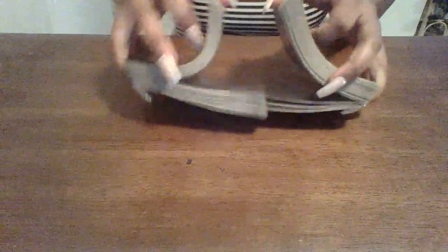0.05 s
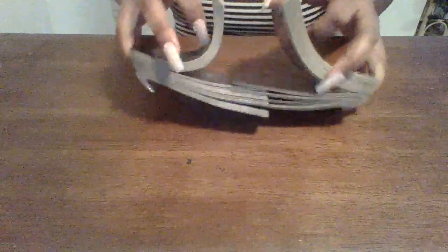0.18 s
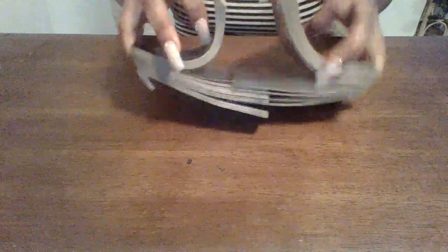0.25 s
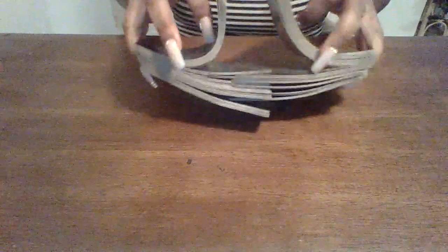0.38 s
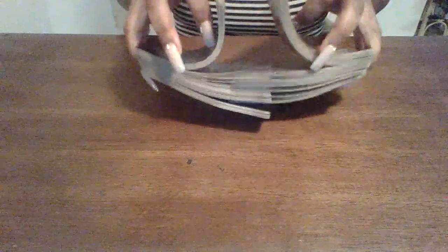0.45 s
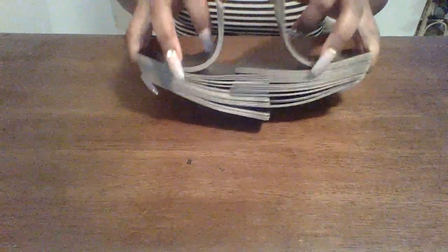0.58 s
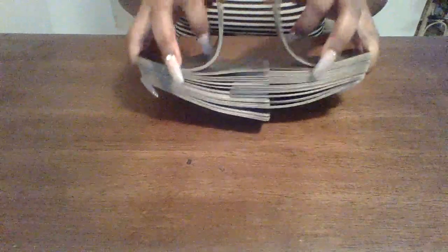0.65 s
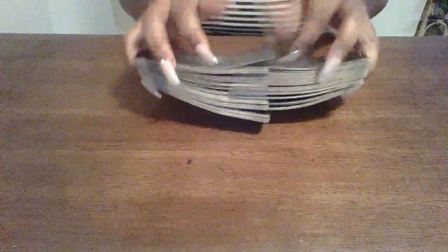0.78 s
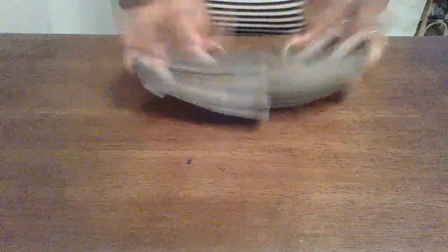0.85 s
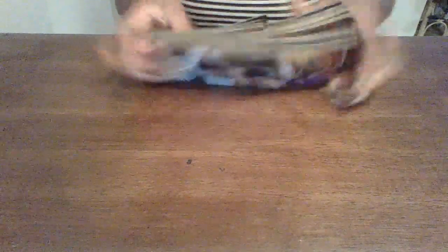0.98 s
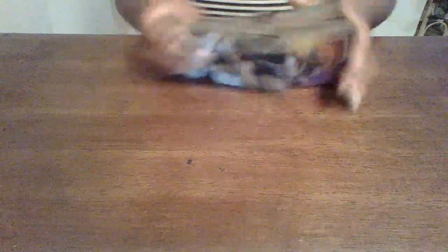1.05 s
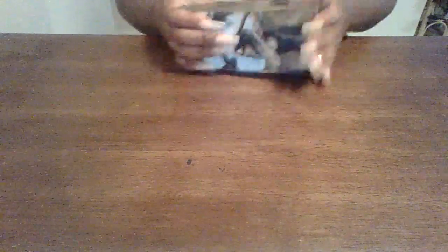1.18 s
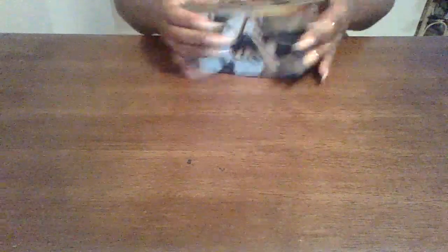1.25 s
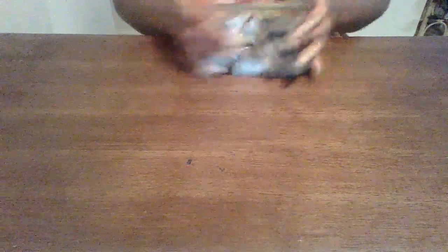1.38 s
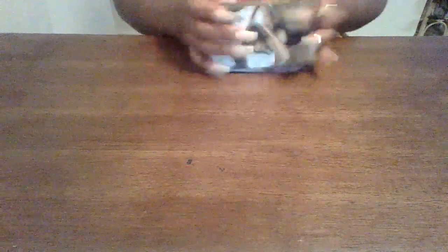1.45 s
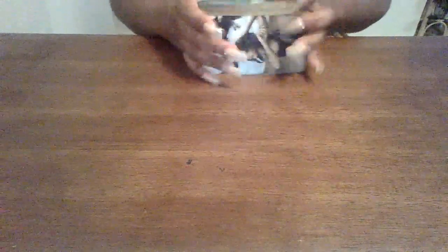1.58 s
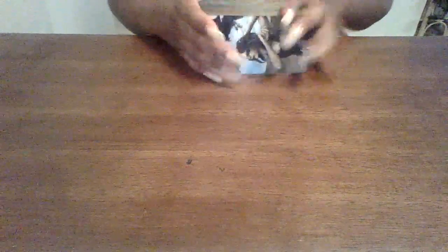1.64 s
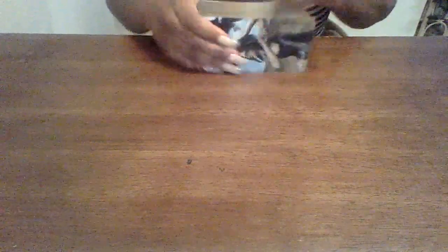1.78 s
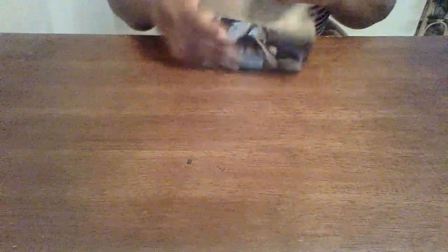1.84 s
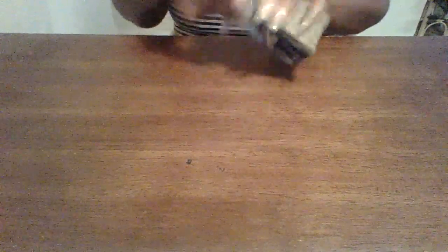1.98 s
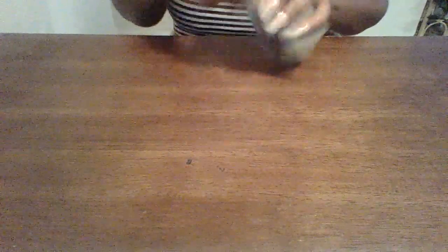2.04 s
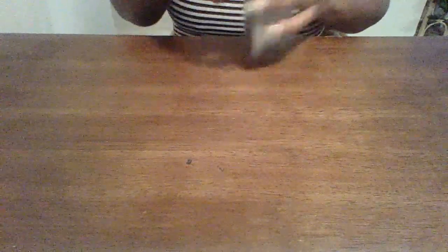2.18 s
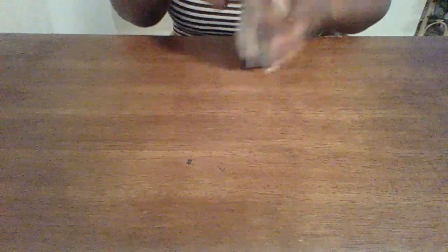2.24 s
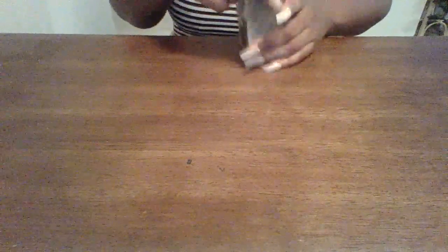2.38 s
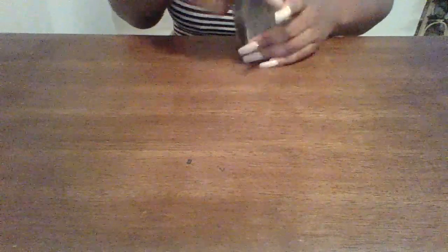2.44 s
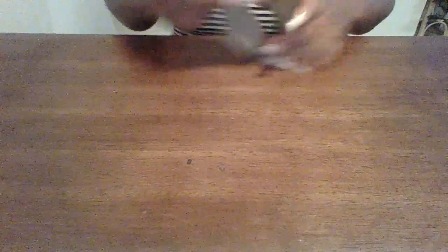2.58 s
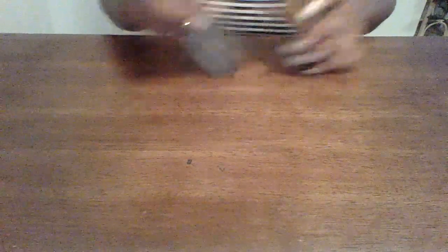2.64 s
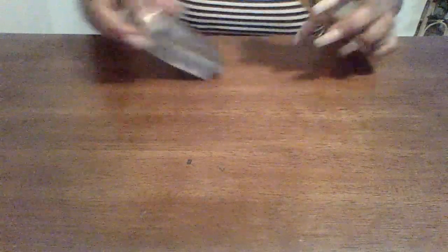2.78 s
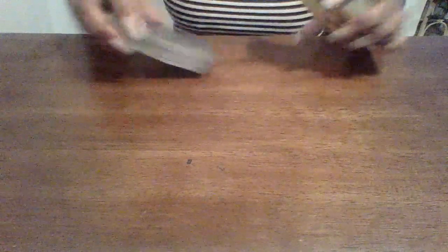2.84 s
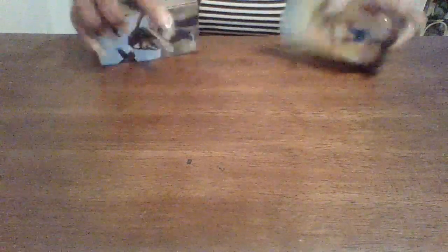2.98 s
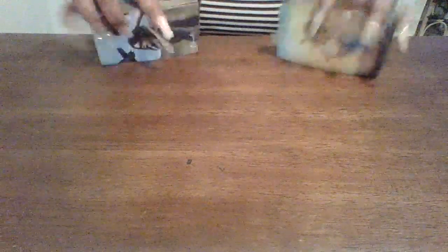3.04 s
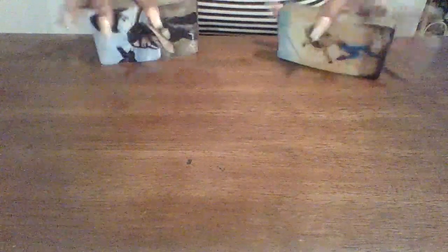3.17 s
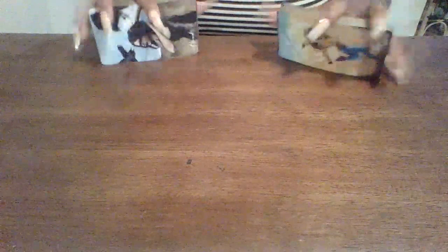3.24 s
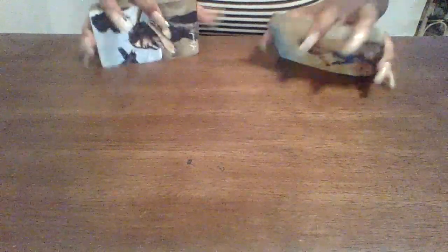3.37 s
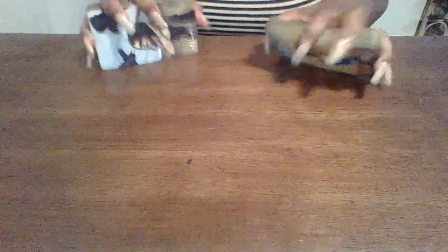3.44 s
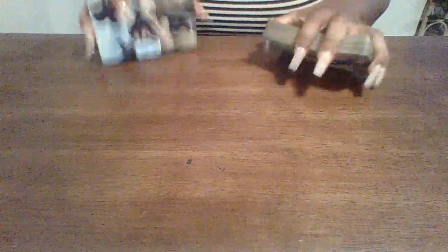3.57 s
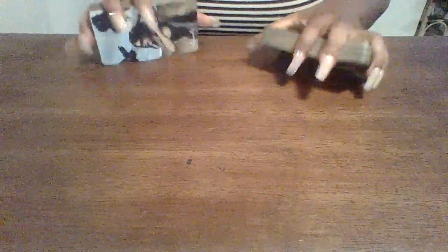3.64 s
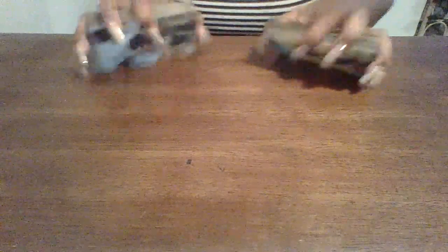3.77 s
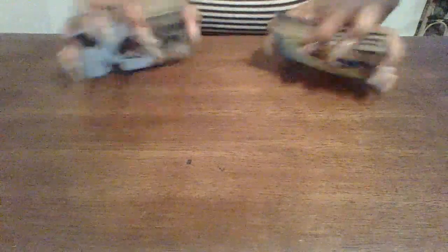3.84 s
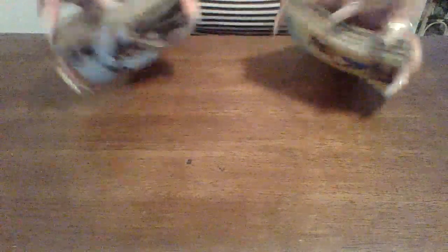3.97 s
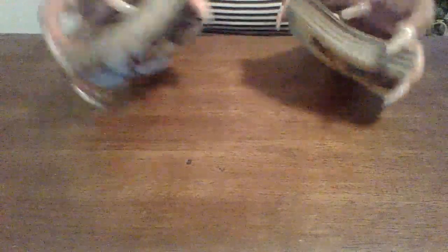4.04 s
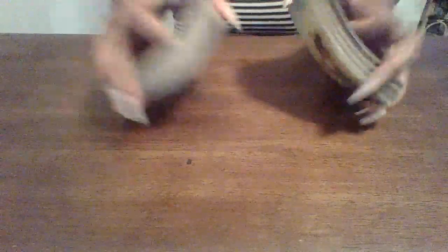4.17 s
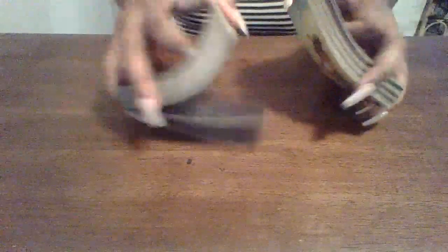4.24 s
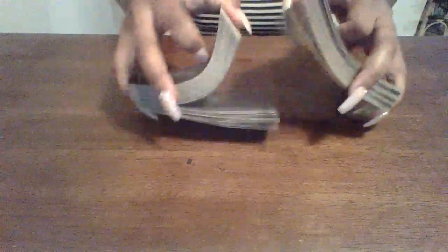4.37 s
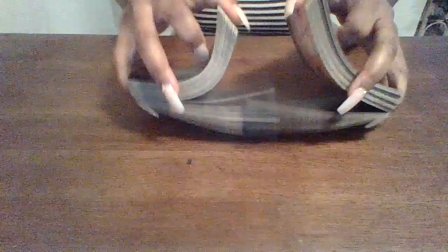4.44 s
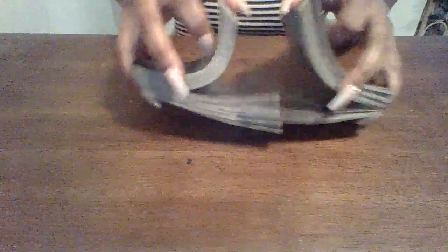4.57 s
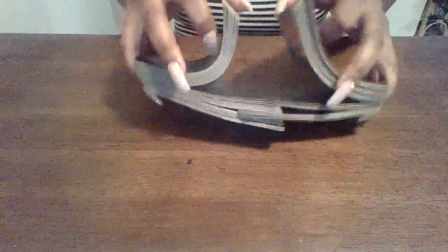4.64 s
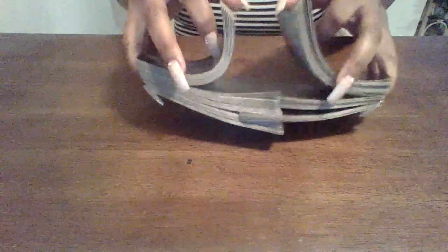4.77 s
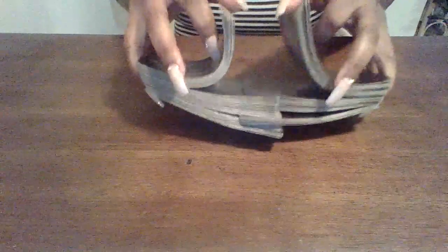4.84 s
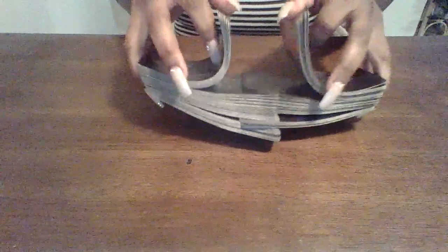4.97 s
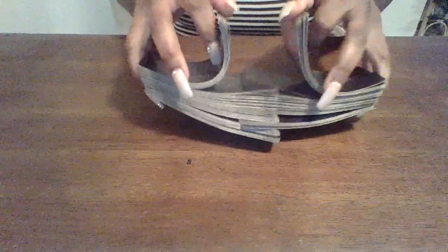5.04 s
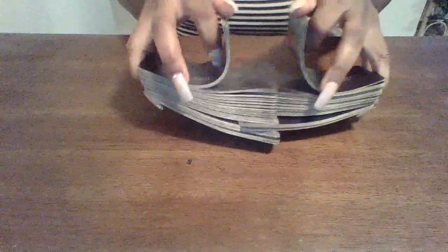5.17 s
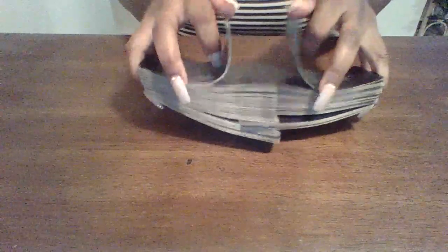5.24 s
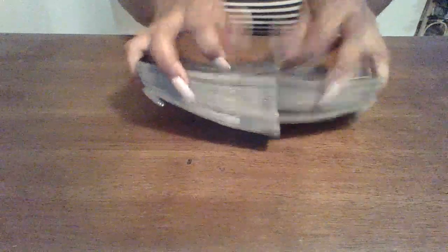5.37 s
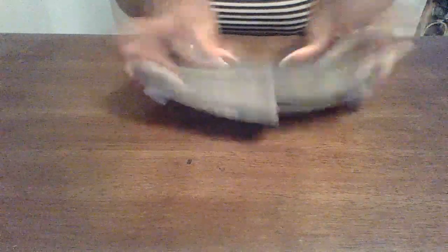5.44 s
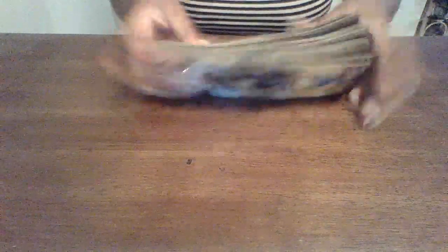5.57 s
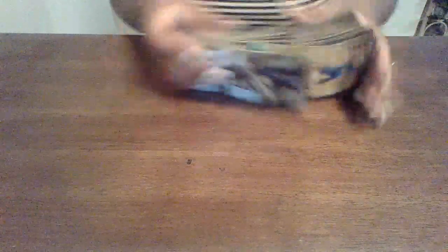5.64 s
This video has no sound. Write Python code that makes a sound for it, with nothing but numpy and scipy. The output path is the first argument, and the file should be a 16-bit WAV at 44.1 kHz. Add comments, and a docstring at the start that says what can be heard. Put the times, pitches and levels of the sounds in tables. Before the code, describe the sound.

Two card riffles on a wooden table frame a quieter middle. First comes a burst of bright flicks, then sliding card faces, a cluster of dull edge taps and light knocks. The deck thumps the table hard once, is cut and set down softly, and one card snaps. The second riffle crackles longer and brighter, ending in a soft push. Close mono pickup in a small room with short reverberation, wood-borne rumble and soft hiss.

```python
"""Small room, wooden table: large stiff playing cards are riffled, pushed together, squared and cut.
Each card snap is a noise burst: ring of the bending card, hiss of its edge, dull slap on the pile.
Sliding faces are friction grains through fixed resonances; knocks ring the table's modes.
Hand movement rumbles through the wood to a mono microphone, over steady room tone."""
import sys
import numpy as np
from scipy import signal
from scipy.fft import rfft, irfft
from scipy.io import wavfile
from scipy.ndimage import uniform_filter1d

SR = 44100
rng = np.random.default_rng(int(sys.argv[2]) if len(sys.argv) > 2 else 0)


def digitize_waveform(pressure):
    """Quantize a signal to 16-bit integers and store it at the path in sys.argv[1].

    Rows of a 2-D input are taken as channels; values are limited to [-1, 1].
    """
    field = np.atleast_2d(pressure).T
    bounded = np.clip(field, -1, 1)
    quanta = np.round(bounded * 32767).astype(np.int16)
    wavfile.write(sys.argv[1], SR, quanta)


def gain_from_decibels(decibels):
    """Convert decibel values to linear amplitude factors."""
    exponent = np.asarray(decibels, float) / 20
    return 10 ** exponent


N = 251370

# Blows on the table top. Each row: time in seconds, relative level in dB,
# tilt to the low modes in dB per octave, shove through the wood in dB.
KNOCKS = [(0.339, -35, 11, -46), (0.528, -28, 14, -40), (.779, -32, -1, -29.5), (1.057, -40.5, 1, -30),
          (1.075, -26.5, -1.5, -34.5), (1.24, -38, -3, -47.5), (1.354, -28.5, -3.5, -39),
          (1.6, -37, -8, -42), (2.319, -19, 9, -45.5), (2.3442, -9.5, -2.5, -30), (2.739, -51, 5.5, -44),
          (3.053, -41, -4.5, -40.5), (3.127, -18.5, 2, -39), (3.154, -25, 0, -39),
          (3.692, -34.5, -5.5, -35), (4.33, -28.5, -1.5, -41), (4.506, -32, 3, -42), (5.231, -32, 17, -45),
          (5.498, -32.5, 25, -56), (5.638, -30, -2.5, -37)]
# Modes of the table top. Each row: frequency in Hz, relative level in dB, T60 in seconds.
TABLE_MODES = [(60.9, -16, 0.12), (140.2, -2, 0.56), (208.8, -15, 0.27), (340.6, -9.5, 0.18),
               (410, -21, 0.4), (636, -26.5, 0.088), (734, 2.5, .04), (913, -6, 0.058), (1620, -7.5, .02),
               (1832, 0, 0.047), (2000, 0, 0.022)]


def rms_one(x):
    """Scale to rms 1."""
    return x / np.sqrt(np.mean(x ** 2) + 1e-20)


def in_time(rows):
    """Columns of a curve, one value per sample."""
    s, *columns = np.transpose(rows)
    return [np.interp(np.arange(N) / SR, s, c) for c in columns]


def at_hz(points, hz):
    """Read a table on a log-frequency axis."""
    table_hz, values = np.array(points).T
    return np.interp(np.log(hz), np.log(table_hz), values)


def band(x, low_hz, high_hz):
    """Butterworth band-pass."""
    edges_hz = np.clip([low_hz, high_hz], 10, .45 * SR)
    return signal.sosfilt(signal.butter(2, edges_hz, "band", fs=SR, output="sos"), x)


def resonance(x, hz, width_hz):
    """Two-pole resonance with gain 1 on top."""
    r = np.exp(-np.pi * width_hz / SR)
    poles = [1, -2 * r * np.cos(2 * np.pi * hz / SR), r * r]
    return signal.lfilter([(1 - r * r) / 2, 0, (r * r - 1) / 2], poles, x)


def drift(rate_hz):
    """Low-passed noise with rms 1: a slow random wander."""
    r = np.exp(-2 * np.pi * rate_hz / SR)
    wander = signal.lfilter([1], [1, -2 * r, r * r], rng.standard_normal(N + SR))
    return rms_one(wander[SR:])


def swell(s, db, rise_s, fall_s):
    """Power envelope: each event rises and dies away exponentially; fall_s is for amplitude."""
    power = np.full(N, 1e-18)
    np.add.at(power, np.round(np.asarray(s) * SR).astype(int), gain_from_decibels(2 * np.asarray(db)))
    rise, fall = np.exp(-1 / (rise_s * SR)), np.exp(-2 / (fall_s * SR))
    dying = signal.lfilter([1], [1, -fall], power)
    return signal.lfilter([1 - rise], [1, -rise], dying)


def snap_rows():
    """All snaps as (s, body dB, body Hz, edge dB, slap dB, ms); high or loud snaps slap relatively less."""
    # Cards off the thumb. Each row: time in seconds, body level in dB, body centre in Hz,
    # edge hiss in dB re body, length in ms.
    flicks = [(0.0246, -19.5, 1720, -23, 3.4), (.036, -17, 3340, -4, 3.9), (0.0401, -13, 3470, 5.5, 3.5),
              (0.0607, -24.5, 3650, 4, 2.5), (0.0856, -20, 2600, -13, 1.7), (0.1292, -24.5, 1600, -1, 0.49),
              (0.1575, -19.5, 4840, 5.5, 0.79), (0.19, -19.5, 4040, -3, 0.52),
              (.245, -23, 3650, -0.5, 0.87), (0.2516, -32, 1860, -6.5, 5.1), (0.2642, -35, 3150, -2.5, 2.8),
              (0.3317, -35, 1530, -14.5, 0.81), (0.3461, -22, 2280, 0.5, 8.7),
              (0.3592, -18.5, 2310, -1.6, 0.89), (0.437, -46, 1350, 5, 5.8), (.454, -41.5, 1250, -5, 2.3),
              (0.4816, -27.5, 2520, 4, 1.6), (0.489, -34, 1320, -11, 2.8), (0.5253, -27.5, 1900, -2.5, 4),
              (0.541, -25.5, 3820, 0.5, 2.1), (0.5489, -27, 2420, -5.5, 5.7), (0.5643, -21.5, 3390, 2, 3.6),
              (0.587, -31, 4920, 2, 4.8), (0.6132, -21.5, 2540, -0.5, 2.6),
              (.6299, -22.5, 2300, -3.5, 0.98), (.649, -20, 2450, -31, 2.9),
              (.6747, -14.5, 2170, -27.5, 0.34), (0.7122, -12.5, 3970, -1.8, 1.3),
              (0.7212, -11, 4140, -4, 1.37), (.774, -16.5, 5600, 3, 3), (0.7901, -29, 4050, -5, 12),
              (0.8019, -24.5, 3000, 1, 1.3), (0.8098, -25, 5310, 5.5, 3.4), (0.8293, -27, 3170, 3, 7.5),
              (3.693, -9, 2780, -15, 2), (3.699, -25, 1510, -29.5, 7.7), (4.3309, -18.5, 2750, -0.1, 3.7),
              (4.3666, -30.5, 2080, -3.5, 2.7), (4.4135, -41.5, 2260, 6, 1.8), (4.428, -49, 1240, 13, 1.9),
              (4.4617, -37, 1470, 1, 3), (4.4684, -31.5, 4100, -15, 2.5), (4.5055, -20.5, 3080, 2, 5.6),
              (4.5738, -52.5, 850, -10, 6.2), (4.5971, -42.5, 2380, -1, 9.3), (4.6198, -21, 2400, -5, 0.32),
              (4.6547, -32, 3030, -1.5, 3), (4.7005, -36.5, 1080, -15, 1.9), (4.7076, -19, 4000, 1, 2.5),
              (4.7105, -4, 3560, -18, 1.7), (4.7163, -20.5, 3330, 1.5, 3.5), (4.7684, -10, 3600, -5, 3.4),
              (4.7752, -10.5, 4800, -3.5, 2.3), (4.7937, -7.5, 3600, -4.5, 2.6),
              (4.8013, -21, 3280, -4, 9.2), (4.8576, -12.5, 5200, -28.5, 3.1),
              (4.8722, -42, 1500, -14, 4.7), (4.8997, -18.5, 4580, 5.5, 1), (4.9213, -40, 1670, -20, 2.9),
              (4.9419, -16, 3850, 1.5, 3.3), (4.9687, -15.5, 5030, -4.5, 2.7), (4.9908, -12, 3040, 0.5, 2),
              (4.997, -22, 4100, -15, 7.1), (5.0481, -25.5, 3130, 0, 3.1), (5.069, -20, 2720, -8, 2.5),
              (5.0783, -18, 4840, 5, 2.8), (5.132, -12.5, 4800, 4.5, 1.5), (5.1353, -22, 5170, -16, 1.3),
              (5.1457, -14, 4000, 0, 2.1), (5.1824, -33, 2100, -13, 8.1), (5.2169, -28.5, 2300, -22, 4.2),
              (5.2412, -14, 1480, -0.5, 1.07), (5.2451, -19, 3370, -11, 5.1), (5.2546, -33, 1880, -11, 7.8),
              (5.2659, -21, 3100, -2, 2.1), (5.293, -21.5, 3120, -1, 2.5), (5.3017, -30, 3040, -10.5, 6.1),
              (5.3118, -20.5, 3500, -3, 3), (5.3219, -29.5, 3300, -16.5, 30), (5.3405, -25, 3260, 0.5, 5.9),
              (5.3606, -26, 3430, -2, 3.4), (5.371, -24.5, 3120, 2.5, 1.7), (5.3985, -27, 5360, 1.5, 3.7)]
    # Deck edges tapped square and set on the table.
    # Each row: time in seconds, body level in dB, body centre in Hz, length in ms.
    taps = [(1.0781, -22, 3300, 1.4), (1.112, -34, 3570, 15), (1.351, -21.5, 1980, 2.5),
            (1.356, -19.5, 1980, 17.8), (1.3789, -19, 2660, 3.2), (1.387, -25, 2020, 2.4),
            (1.4419, -21.5, 2720, 1.4), (1.4913, -29.5, 1890, 6.9), (1.5132, -29, 2160, 1.8),
            (1.538, -31, 2250, 3.7), (1.5639, -25, 2670, 6.2), (1.5722, -22, 2630, 1.8),
            (1.5828, -25, 2000, 10.4), (1.6008, -12, 3360, 0.94), (1.6088, -29, 4290, 1.4),
            (1.6248, -20, 3100, 0.96), (1.695, -41.5, 2140, 8.4), (2.3181, -39.5, 1203, 24),
            (2.3334, -23.5, 920, 2.2), (2.3447, -11.5, 1520, 1), (2.3543, -21.5, 1270, 11),
            (3.049, -36.5, 1740, 6.6), (3.0538, -40, 1300, 15), (3.1293, -24, 1820, 4.1),
            (3.1449, -36, 1220, 6.8), (3.1565, -22, 1435, 13), (3.1687, -34, 1390, 8.7),
            (3.2654, -46.5, 1380, 4.8), (3.2945, -38.5, 1790, 4.9), (3.4907, -60.5, 980, 17),
            (5.6386, -32, 1830, 2.3)]
    # Nails and corners ticking. Each row: time in seconds, body level in dB, body centre in Hz.
    ticks = [(.9395, -38, 2780), (0.9622, -37, 2860), (1.0265, -48, 2600), (1.8318, -39, 3160),
             (1.9352, -54, 2420), (1.993, -57, 2270), (2.1219, -45, 5330), (2.162, -52, 4570),
             (2.1949, -52, 5250), (2.359, -29.5, 3600), (2.599, -48.5, 3150), (2.614, -54, 2430),
             (2.7398, -55.5, 1500), (2.7908, -60, 870), (2.887, -51, 2560), (2.9293, -58.5, 1900),
             (3.0146, -49, 2670), (3.3262, -33.5, 4080), (3.688, -40.5, 4040), (4.005, -53, 3600),
             (4.209, -49, 1720), (4.233, -44.5, 2270), (4.269, -60, 1780), (4.291, -51, 5630),
             (4.3029, -51, 3560), (5.4962, -36.5, 3500), (5.528, -39, 3900), (5.6, -49, 2160),
             (5.6526, -33, 3940)]
    # Weak cards slipping at random. Each row: start in seconds, end in seconds, mean body level in dB.
    flutter = [(0.506, .85, -32.5), (4.378, 4.698, -53), (5.1, 5.418, -40)]
    tap_edge_db, tick_edge_db, tick_ms = -23.5, 0, 2.5
    # slap re body, for a body at 2 kHz and the reference level
    flick_slap_db, tap_slap_db, tick_slap_db = -3, -10, -11.5
    slap_db_per_octave, slap_lag_db_per_db, reference_db = -8.5, 0.35, -23.5

    rows = [(s, db, hz, edge_db, flick_slap_db, ms) for s, db, hz, edge_db, ms in flicks]
    rows += [(s, db, hz, tap_edge_db, tap_slap_db, ms) for s, db, hz, ms in taps]
    rows += [(s, db, hz, tick_edge_db, tick_slap_db, tick_ms) for s, db, hz in ticks]
    for start_s, end_s, mean_db in flutter:
        places, chance = rng.random(size=10), rng.standard_normal(size=(10, 3))
        for place, (louder, higher, hissier) in zip(places, chance):
            s = start_s + (end_s - start_s) * place
            hz = 2600 * gain_from_decibels(4.9 * higher)
            rows.append((s, mean_db + louder, hz, 5 * hissier, flick_slap_db, tick_ms))
    rows = np.array(rows)
    octaves = np.log2(rows[:, 2] / 2000)
    rows[:, 4] += slap_db_per_octave * octaves - slap_lag_db_per_db * (rows[:, 1] - reference_db)
    return rows


def colour(x, bend=1):
    """Fixed resonances that colour every card sound, over a plain share; bend scales their frequencies."""
    # Each row: frequency in Hz, width in Hz, level in dB re plain share.
    resonances = [(800, 43, 14), (1612, 290, 13.5), (1900, 89, -4.5), (2620, 240, 9), (3900, 1900, -5),
                  (6070, 1300, -2)]
    return x + sum(gain_from_decibels(db) * resonance(x, bend * hz, width_hz) for hz, width_hz, db in resonances)


def snaps(rows):
    """Each snap is a noise burst in three parts: bending ring of the card, hiss of its edge, dull slap."""
    size = 4096
    out = np.zeros(N + size)
    now_ms = np.arange(size) * 1000 / SR
    noises = rng.standard_normal((len(rows), 3, size))
    for (s, db, hz, edge_db, slap_db, length_ms), noise in zip(rows, noises):
        length_ms = max(length_ms, .3)
        attack = 1 - np.exp(-now_ms / (0.36 * length_ms))
        decay = np.exp(-now_ms / (0.64 * length_ms)) + 0.073 * np.exp(-now_ms / 5.2)
        bursts = noise * attack * decay
        ring = resonance(resonance(bursts[0], hz, 1.5 * hz), hz, 1.5 * hz)
        bend = gain_from_decibels(.5 * noise[0, 0])   # slight, at random per snap
        body = colour(band(ring, 0.076 * hz, 3.37 * hz), bend=bend)
        edge = band(bursts[1], 7300, 19000)
        pile_note = resonance(bursts[2], 600, 210)   # woody
        slap = band(bursts[2], 140, 1200) + 0.5 * pile_note
        at = round(s * SR) - 20
        # each part is levelled by its highest short-term rms
        for part, part_db, window in ((body, 0, 70), (edge, edge_db, 70), (slap, slap_db, 200)):
            top = np.sqrt(uniform_filter1d(part ** 2, size=window).max())
            out[at:at + size] += gain_from_decibels(db + part_db) * part / top
    return out[:N]


def friction(column, steady_db, s, after_db):
    """Gain of a friction layer: steady rubbing, strokes and settling after snaps add in power."""
    # One pile along another. Each row: peak time in seconds, rise in seconds, scrape in dB, hiss in dB.
    stroke_rows = [(.36, 0.036, -40.5, -40), (1.115, 0.077, -48.5, -45.5), (1.236, 0.057, -41, -36.5),
                   (1.469, 0.081, -53.5, -47), (1.638, 0.033, -39, -58), (1.829, 0.028, -51, -48.5),
                   (2.113, 0.058, -58.5, -50), (2.449, 0.2, -44.5, -59), (2.645, 0.047, -54, -57.5),
                   (2.684, 0.018, -66, -56), (2.735, .025, -70, -60.5), (2.808, 0.038, -63.5, -55.5),
                   (3.053, 0.023, -47, -45.5), (3.334, 0.0324, -45, -60), (3.494, .06, -61.5, -61.5),
                   (3.886, 0.052, -56.5, -54.5), (3.991, 0.032, -59.5, -63), (4.242, .05, -64, -77.5),
                   (5.148, 0.025, -25, -26)]
    stop_faster = 2   # a stroke ends more abruptly than it starts
    now_s = np.arange(N) / SR
    strokes = np.zeros(N)
    for row in stroke_rows:
        away = (now_s - row[0]) / row[1] * np.where(now_s > row[0], stop_faster, 1)
        strokes += gain_from_decibels(2 * row[column]) * np.exp(-4 * away ** 2)
    settling = swell(s, after_db, rise_s=0.001, fall_s=0.037)
    return np.sqrt(gain_from_decibels(2 * steady_db) + strokes + settling)


def slide(rows):
    """Dense friction grains of random size excite shifted resonances; their treble is heard as hiss."""
    # Steady rubbing of card faces. Each row: time in seconds, scrape in dB, hiss in dB.
    rubbing = [(0, -31.5, -36), (.1, -50, -52), (.3, -59.5, -53), (.55, -49, -49.5), (.84, -51.5, -40.5),
               (1.01, -57.5, -60.5), (1.3, -52, -57), (1.56, -37, -55), (1.77, -59, -81), (2.23, -78, -85),
               (2.65, -58.5, -76), (3, -72, -61.5), (3.66, -74, -86.5), (4.15, -79.5, -93),
               (4.5, -57, -56.5), (4.72, -47, -44), (5.36, -44, -37.5), (5.45, -50, -51), (5.63, -65, -62),
               (5.7, -36.5, -54)]
    # Copies of the resonances, each coming and going by itself: one frequency factor per entry.
    bends = (.88, 1.01, 1)
    flex_db, settle_scrape_db, settle_hiss_db = 6, -21, -20   # settling re body, re edge hiss
    scrape_db, hiss_db = in_time(rubbing)
    s, db, hz, edge_db = rows.T[:4]
    sizes = gain_from_decibels(2.5 * np.minimum(rng.exponential(1, N), 5)) * rng.choice([-1, 1], N)
    present = rng.random(N) < 9000 / SR   # grains per second
    grains = sizes * present * gain_from_decibels(2.2 * drift(90.0))
    rub, hiss = band(grains, 230, 4100), band(grains, 3200, 15000)
    scrape = sum(gain_from_decibels(flex_db * drift(5.2)) * colour(rub, bend=bend) for bend in bends)
    scrape_gain = friction(column=2, steady_db=scrape_db, s=s, after_db=db + settle_scrape_db)
    hiss_gain = friction(column=3, steady_db=hiss_db, s=s, after_db=db + edge_db + settle_hiss_db)
    return scrape_gain * rms_one(scrape) + hiss_gain * rms_one(hiss)


def knocks():
    """Soft blows strike every table mode as a decaying sine; each blow has its own tilt to the low modes."""
    s, db, tilt_db, _ = np.transpose(KNOCKS)
    at, out = np.round(s * SR).astype(int), np.zeros(N)
    spread_db = rng.normal(0, 0.58, (len(at), len(TABLE_MODES)))
    for k, (hz, mode_db, t60_s) in enumerate(TABLE_MODES):
        blows = np.full(N, 1e-18)
        blows[at] = gain_from_decibels(db + mode_db - tilt_db * np.log2(hz / 141) + spread_db[:, k])
        r, w = gain_from_decibels(-60 / (t60_s * SR)), 2 * np.pi * hz / SR
        ringing = signal.lfilter([0, np.sin(w)], [1, -2 * r * np.cos(w), r * r], blows)
        out += (-1) ** k * ringing
    return gain_from_decibels(-11) * signal.lfilter([.3], [1, -.7], out)   # the contact is soft


def hands():
    """Low noise carried by the wood keeps the two lowest table modes stirring; every knock shoves it."""
    # Pressure of the hands, as rumble. Each row: time in seconds, level in dB.
    pressure = [(0, -39.5), (.35, -50), (.65, -39.5), (.86, -46), (1.01, -54), (1.21, -50), (1.32, -49.5),
                (1.89, -54.5), (2.25, -60.5), (2.69, -61), (2.89, -55.5), (3.55, -53.5), (3.66, -68.5),
                (3.92, -55), (4.14, -68), (4.43, -44), (4.8, -46), (5.2, -45), (5.36, -36.5), (5.57, -60),
                (5.7, -36)]
    level_db, = in_time(pressure)
    s, _, _, shove_db = np.transpose(KNOCKS)
    noise = rng.standard_normal(N) * gain_from_decibels(2.5 * drift(15.0))
    rumble = rms_one(band(band(noise, 17, 75), 5.3, 210)) + gain_from_decibels(-11) * rms_one(band(noise, 100, 500))
    stirred = sum(gain_from_decibels(-8.5) * rms_one(resonance(noise, hz, 18.0)) for hz, _, _ in TABLE_MODES[:2])
    shoves = swell(s, shove_db, rise_s=0.0044, fall_s=0.044)
    return np.sqrt(gain_from_decibels(2 * level_db) + shoves) * (rumble + stirred)


def room(x):
    """A near wall, and a diffuse tail: quarter-octave bands of noise that die at their own rate."""
    # Decay. Each row: frequency in Hz, T60 in seconds.
    decay_times = [(200, .45), (1000, .38), (2000, .36), (4000, .3), (6000, .23), (9000, .15), (14000, .11)]
    # Reverberant energy. Each row: frequency in Hz, energy in dB.
    energies = [(200, -10.5), (500, -7.5), (1000, -24.5), (2000, -10.5), (3500, -10), (5500, -12.5),
                (8000, -14), (14000, -31)]
    wall_s, wall_db = .0081, -12
    now_s = np.arange(SR // 2) / SR
    edges_hz, tail = 100 * 2 ** np.arange(0, 7.6, .25), 0
    noises = rng.standard_normal((len(edges_hz), len(now_s)))
    for low, high, noise in zip(edges_hz, edges_hz[1:], noises):
        hz = np.sqrt(low * high)
        decay = gain_from_decibels(-60 * now_s / at_hz(decay_times, hz))
        dying = band(noise, low, high) * decay * (1 - np.exp(-now_s / 0.004))
        share = (high - low) / (SR / 2)
        tail = tail + dying * gain_from_decibels(at_hz(energies, hz)) * np.sqrt(share / np.sum(dying ** 2))
    smear = rng.standard_normal(60) * np.hanning(60)
    echo = band(signal.fftconvolve(x, smear / np.linalg.norm(smear)), 3500, 9000)
    wall = np.pad(echo, (round(wall_s * SR) - 30, 0))   # less half the smear
    return signal.fftconvolve(x, tail)[:N] + gain_from_decibels(wall_db) * wall[:N]


def air():
    """Room tone and microphone hiss: steady noise shaped by a spectrum."""
    # Each row: frequency in Hz, relative density in dB per Hz.
    spectrum = [(15, -21), (25, 1.5), (149, 6.5), (229, -23.5), (317, -7.5), (354, -11), (695, -22.5),
                (1100, -31), (3080, -18), (16000, -23.5)]
    level_db = -59.5   # rms
    hz = np.maximum(np.arange(N // 2 + 1) * SR / N, 15)
    shaped = rfft(rng.standard_normal(N)) * gain_from_decibels(at_hz(spectrum, hz))
    return gain_from_decibels(level_db) * rms_one(irfft(shaped, N))


def scene():
    """Cards and table in the room, hands through the wood, room tone under all."""
    rows = snap_rows()
    cards = snaps(rows) + slide(rows)
    table = knocks()
    airborne = cards + band(table, 550, 8000)   # the low modes reach the microphone through the wood
    mono = cards + table + room(airborne) + hands() + air()
    return np.stack([mono, mono])


def roll_off(x):
    """The treble ends steeply here."""
    return signal.sosfilt(signal.butter(12, 16490, fs=SR, output="sos"), x)


def record(dry):
    """The microphone's top is cut at 16.3 kHz and peaks are clipped at full scale."""
    cut = signal.sosfilt(signal.cheby2(10, 40, 16300, fs=SR, output="sos"), dry)
    return roll_off(np.clip(cut, -1, 1))


dry = scene()
out = record(dry)
digitize_waveform(out)
```